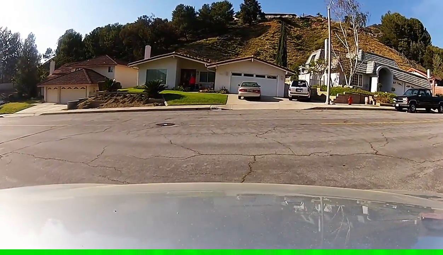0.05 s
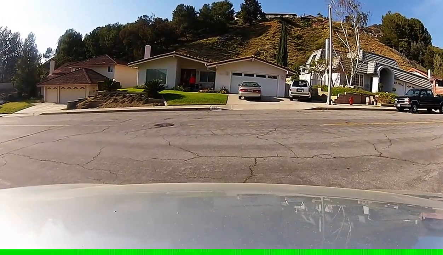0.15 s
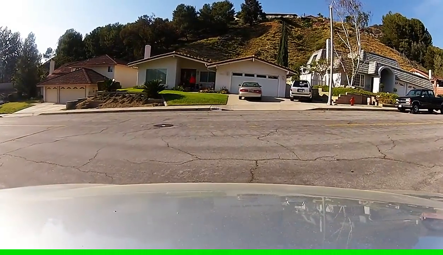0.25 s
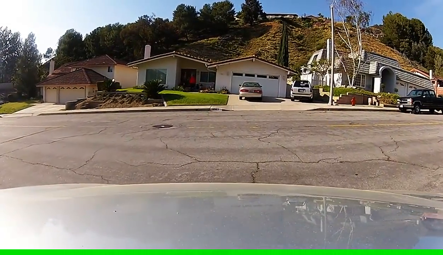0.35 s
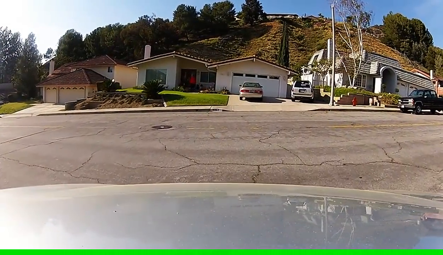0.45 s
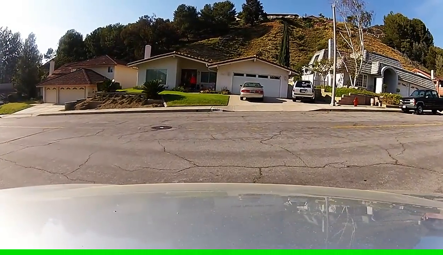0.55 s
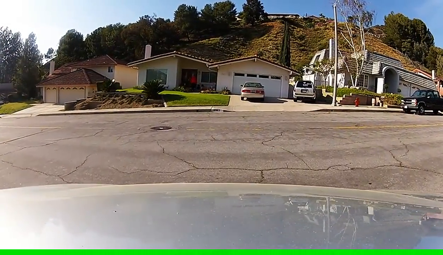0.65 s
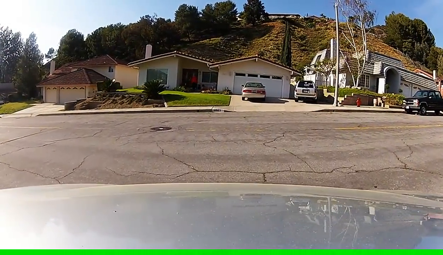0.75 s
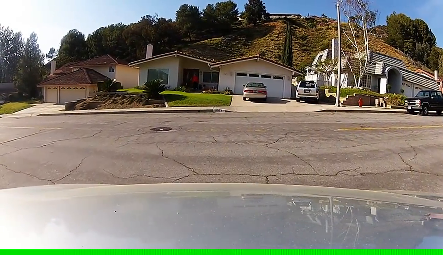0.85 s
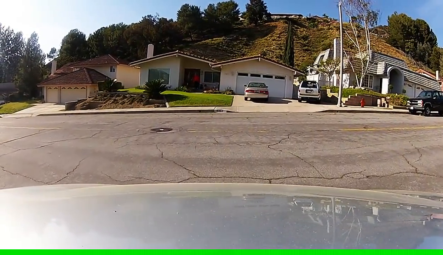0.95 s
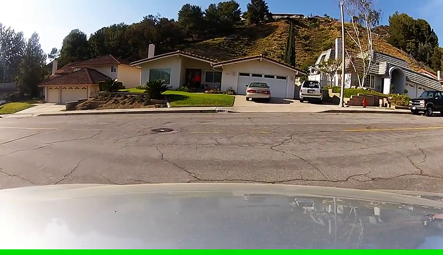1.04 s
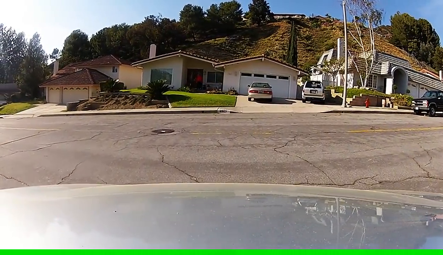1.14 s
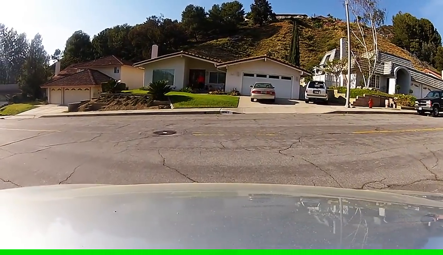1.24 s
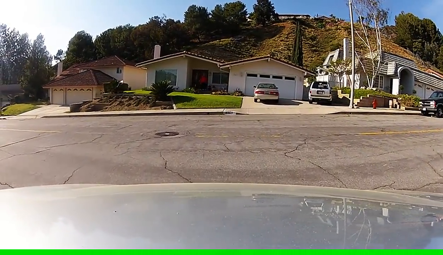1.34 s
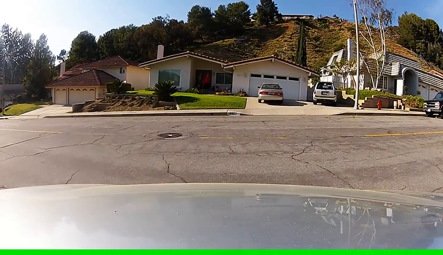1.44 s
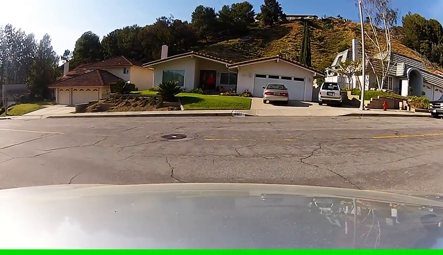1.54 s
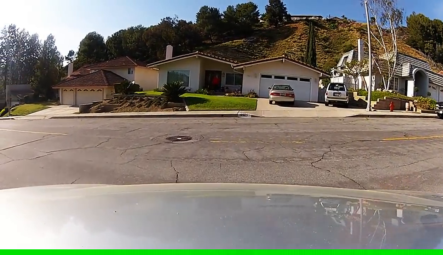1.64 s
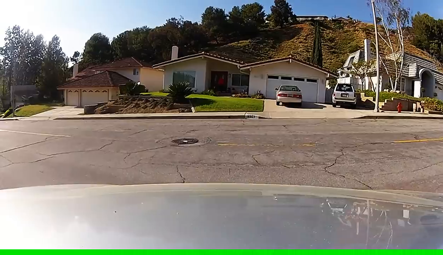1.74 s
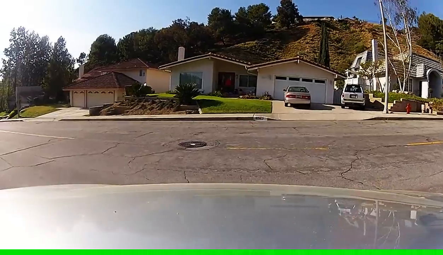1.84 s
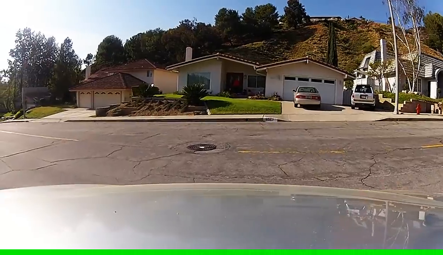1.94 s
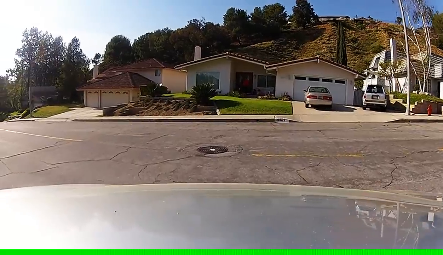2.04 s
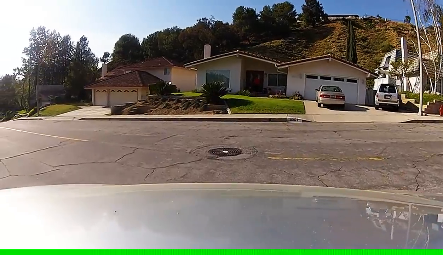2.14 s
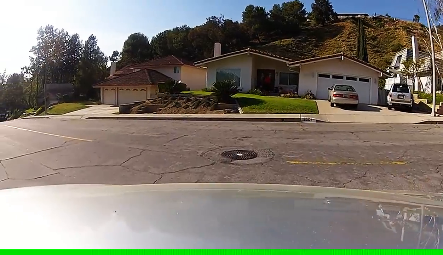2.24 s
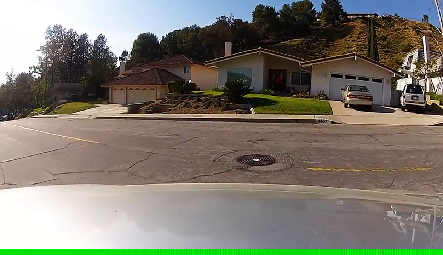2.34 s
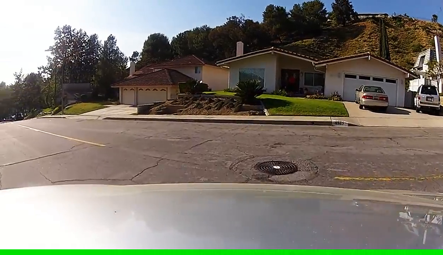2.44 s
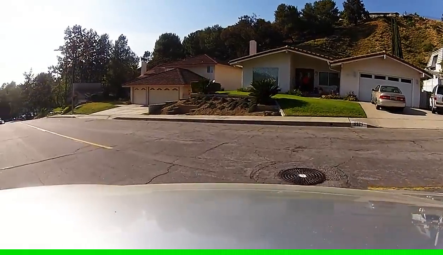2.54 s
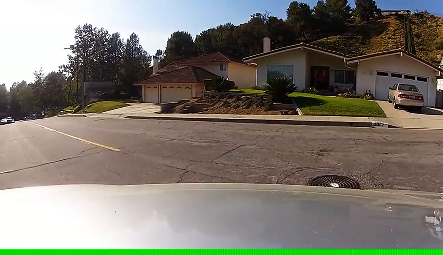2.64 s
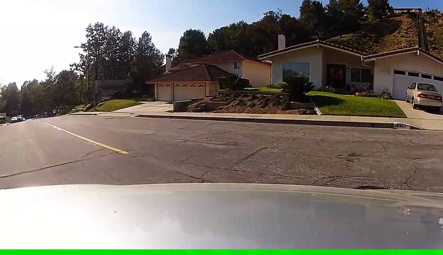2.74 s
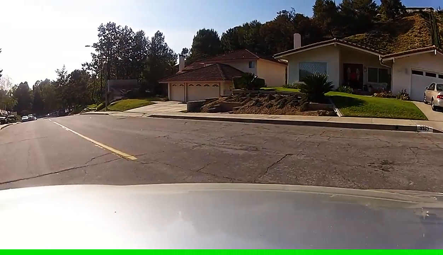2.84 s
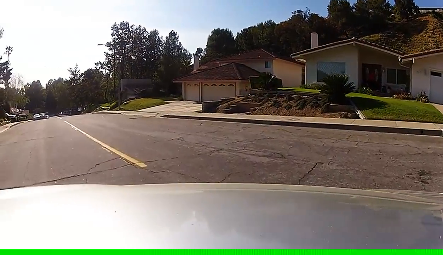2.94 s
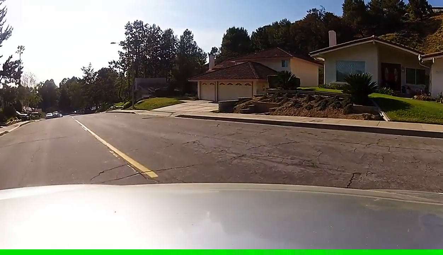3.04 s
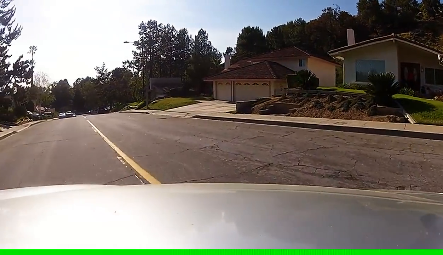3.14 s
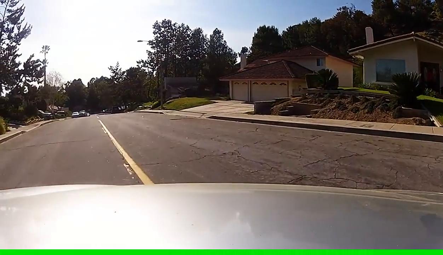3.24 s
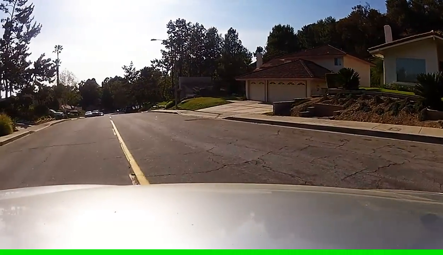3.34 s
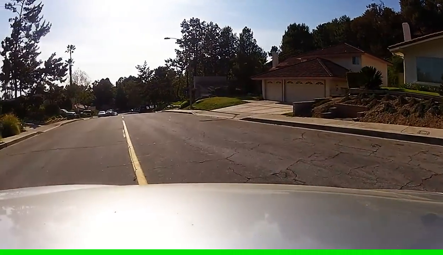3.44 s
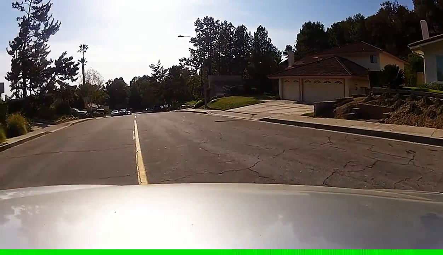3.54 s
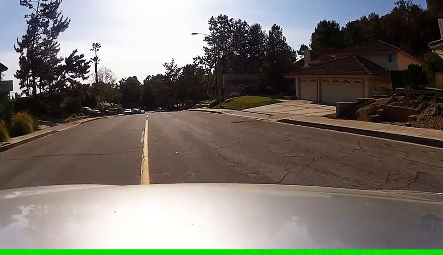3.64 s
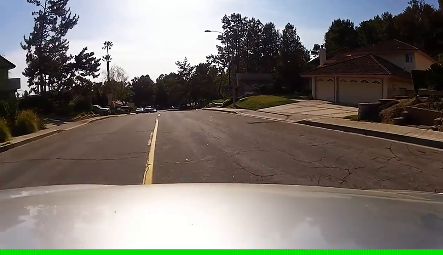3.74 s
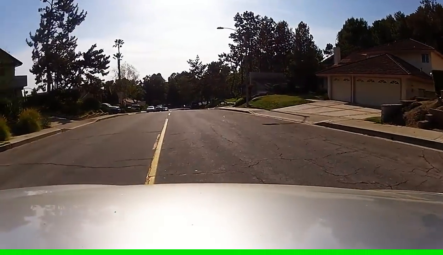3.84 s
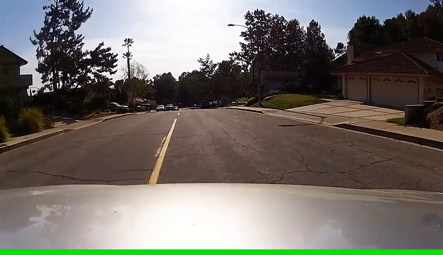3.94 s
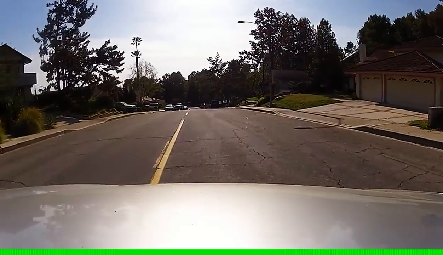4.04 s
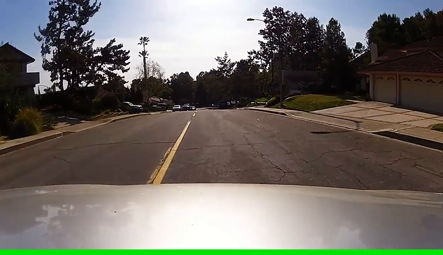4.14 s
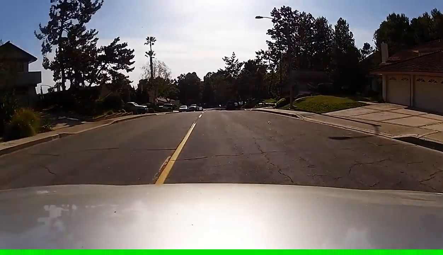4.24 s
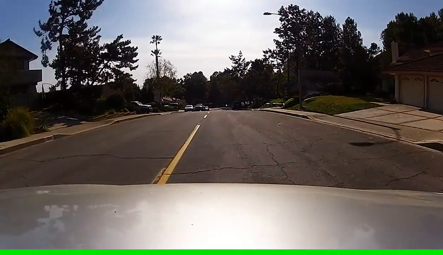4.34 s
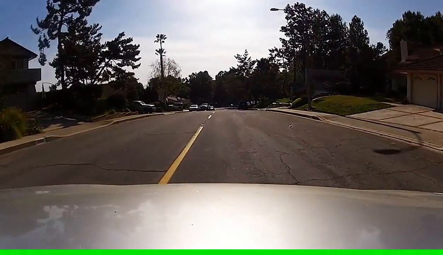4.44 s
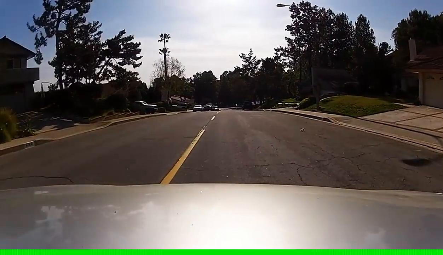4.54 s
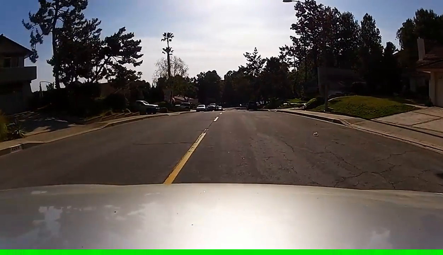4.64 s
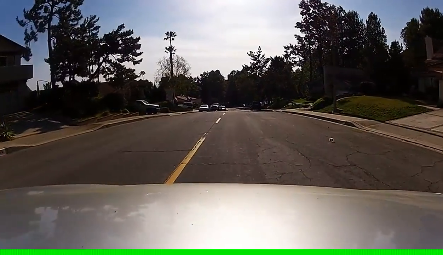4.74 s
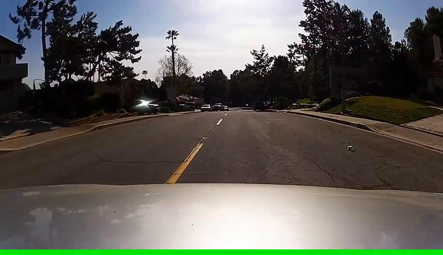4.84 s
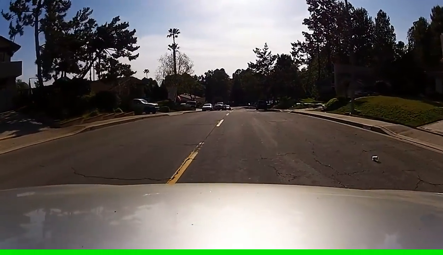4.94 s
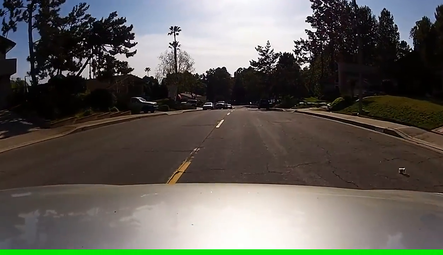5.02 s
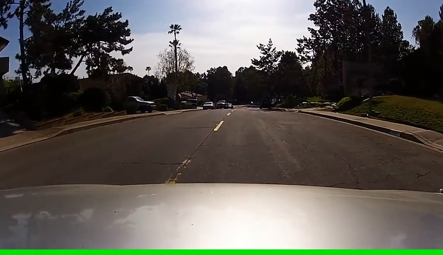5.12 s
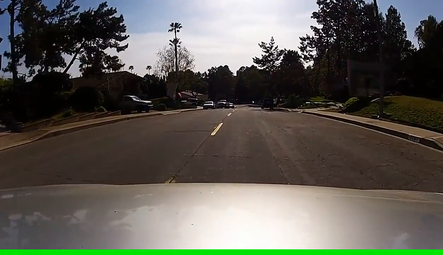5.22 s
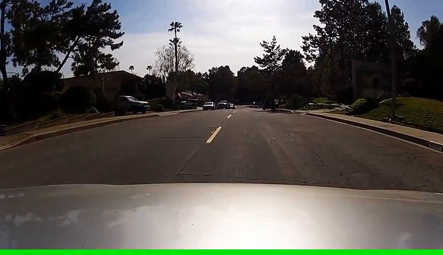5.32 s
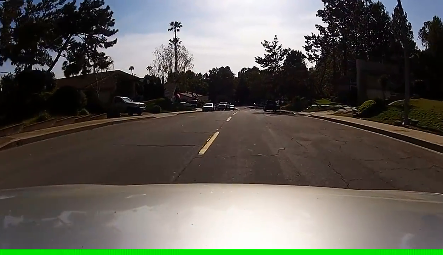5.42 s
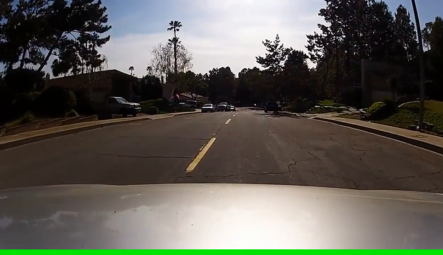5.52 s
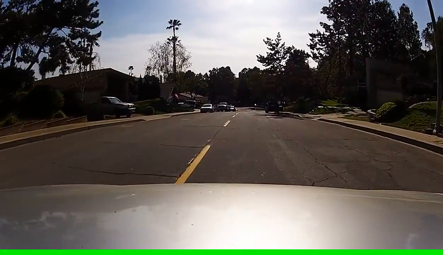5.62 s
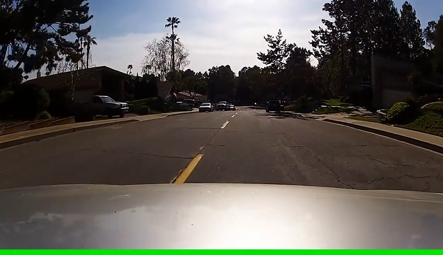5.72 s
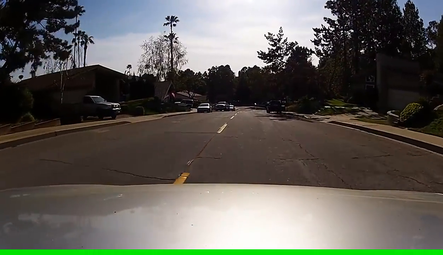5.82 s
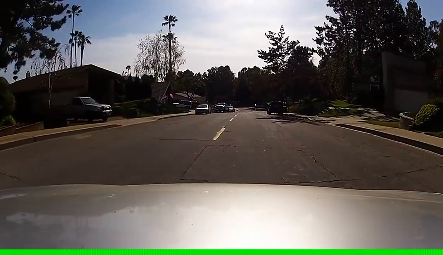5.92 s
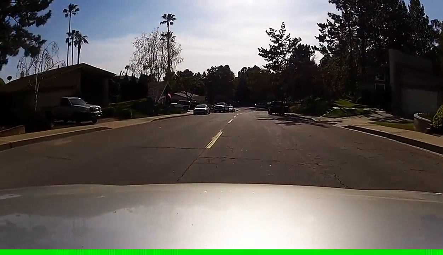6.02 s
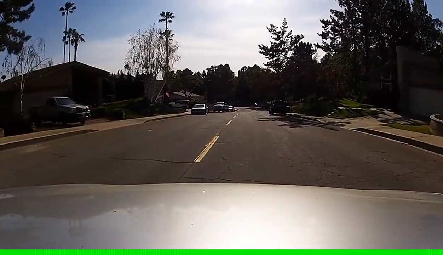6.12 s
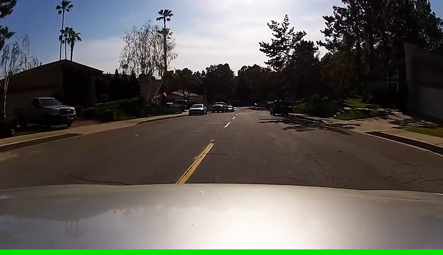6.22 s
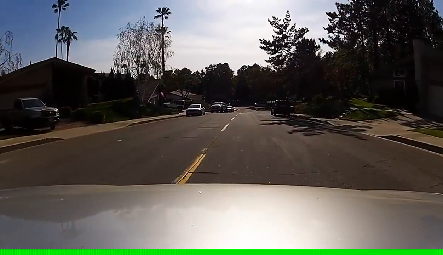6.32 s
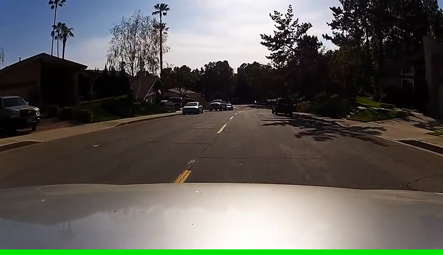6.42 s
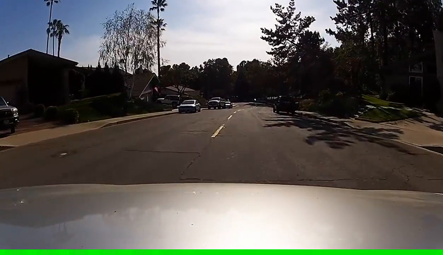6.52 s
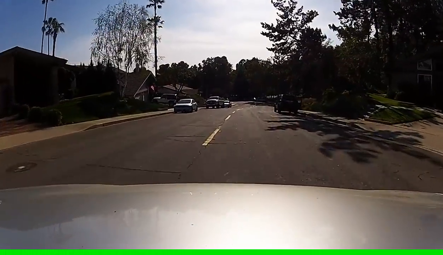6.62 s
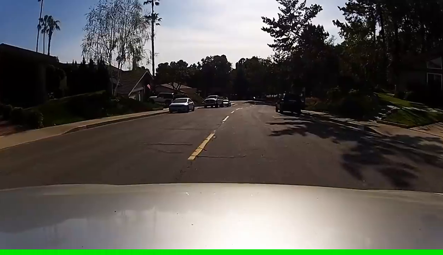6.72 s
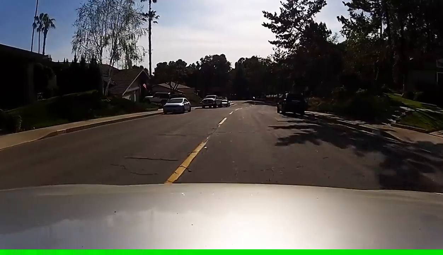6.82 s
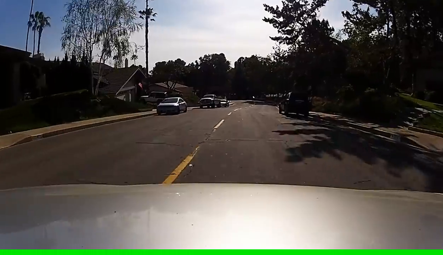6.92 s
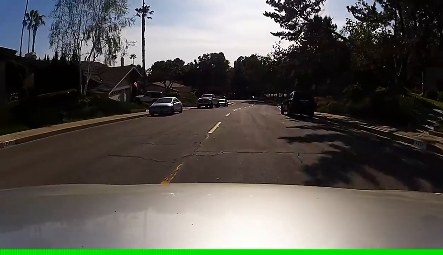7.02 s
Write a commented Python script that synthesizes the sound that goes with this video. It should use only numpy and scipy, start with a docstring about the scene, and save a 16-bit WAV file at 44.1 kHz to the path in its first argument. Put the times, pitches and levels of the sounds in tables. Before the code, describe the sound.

Heard from a microphone sealed in a case on the car, a V8 burbles unevenly at idle with a faint steering-pump moan. From about two and a half seconds it pulls away, deepening and rising. Revs drop at an upshift, then climb again. Soft boomy bumps, low road rumble, thin pump whine and rushing air build with speed on an open residential street.

```python
"""A V8 engine burbles at idle, then pulls twice with an upshift between: firing pulses and crank orders.
Road noise booms and thuds through resonant body panels, over bumps, with passing swells of road noise.
Pumps, alternator, gearbox and driveline add tones; the engine bay whirrs and air rushes by as noise.
A microphone in a closed case on the car hears it: the case rings at fixed pitches, and uneven
sampling mirrors the sound as a faint sizzle in the treble."""
import sys
import numpy as np
from scipy.fft import rfft, irfft, next_fast_len
from scipy.io import wavfile
from scipy.ndimage import uniform_filter1d, map_coordinates

SR = 44100
rng = np.random.default_rng(int(sys.argv[2]) if len(sys.argv) > 2 else 0)


def to_wav(s):
    """Save 16-bit WAV."""
    ch = np.atleast_2d(s).T  # columns
    pcm = np.round(np.clip(ch, -1, 1) * 32767)  # PCM
    wavfile.write(sys.argv[1], SR, pcm.astype(np.int16))


N = 311787

# Crankshaft through idle, pull-away, upshift and second pull. Each row: time in s, speed in turns per s.
CRANK_SPEED = [(0, 13.1), (0.5, 12.48), (0.95, 12.2), (1.5, 12.48), (2.7, 12.35), (3, 13.35), (4, 18.95),
               (4.35, 21.3), (4.6, 22.8), (4.88, 24.25), (5.2, 23.1), (5.46, 22), (5.53, 21.4), (5.6, 19.9),
               (5.68, 18.55), (5.8, 19.95), (5.95, 21), (6.2, 22), (6.35, 21.9), (6.5, 22.8), (6.7, 23.45),
               (6.92, 24.15), (7.07, 24.3)]
# How hard the engine works. Each row: time in s, effort in dB relative to idle.
EFFORT = [(0, 1.5), (0.28, -1.5), (0.4, -6), (0.55, -3), (1.15, 0), (1.7, 7), (2.25, 2.5), (2.5, 11.5),
          (3.0, 14.5), (3.4, 17), (4.35, 15.5), (4.7, 26), (5.05, 16.5), (5.65, 19), (6.25, 23), (7.07, 15)]
# Road speed: the car creeps, then gathers way. Each row: time in s, speed in m/s.
ROAD_SPEED = [(0, 0.59), (1, 0.21), (2.1, 1.37), (3, 4.27), (4, 7.4), (4.75, 8.62), (5.3, 8.28),
              (6.2, 9.64), (7.07, 9.7)]
IDLE_TURNS_PER_S, CRUISE_M_PER_S = 12.4, 10  # reference speeds of the level laws

# Exhaust strength of the eight cylinders in firing order. Each entry: relative level in dB.
CYLINDER_DB = [-19, -41, -4.5, -4.5, -12, 1, -1.5, -0.5]
# Resonances of the body panels. Each row: frequency in Hz, width in Hz, peak gain in dB.
BODY_MODES = [(81.5, 23, 5), (121.4, 11.3, 7), (179.4, 18.8, 17.5), (218.2, 25, 11)]
# Resonances of the microphone's case. Each row: frequency in Hz, width in Hz, peak gain in dB.
CASE_MODES = [(451, 19, 3.5), (691.8, 12, 9), (730.6, 37.4, 15), (852, 72, 10), (1098, 44, 6),
              (1622, 21, 5), (1870, 23, 6), (2217, 62, 7.5), (2376, 88, 6), (3100, 87, 10), (3508, 53, 9),
              (3758, 55, 11.5)]

# Spectra ahead of any resonances. Each row: frequency in Hz, relative level in dB per Hz.
EXHAUST_SPECTRUM = [(30, -40), (70, -24), (110, 4.5), (200, 0.5), (260, -8), (400, -16), (560, -47),
                    (1200, -81)]
BOOM_SPECTRUM = [(70, -44), (130, -4.5), (170, 3), (225, 4.5), (252, -21.5), (400, -42), (800, -91)]
SWAY_SPECTRUM = [(8, -25), (18, -2), (25, 13.5), (33, -4.5), (42, 4.5), (80, -95)]
RUMBLE_SPECTRUM = [(25, -28), (38, -1), (50, 47), (68, 42.5), (80, 37), (120, -89)]
DRONE_SPECTRUM = [(55, -27), (74, -6), (90, 2), (135, 0), (190, -26.5), (300, -28.5), (800, -91)]
GROWL_SPECTRUM = [(150, -34), (260, 3.5), (320, 2), (370, -3), (430, -8.5), (520, -12.5), (620, -29),
                  (1200, -88)]
WHIRR_SPECTRUM = [(120, -8), (300, -8), (450, 3.5), (580, -7), (660, 3), (750, 2), (1000, -0.5), (1300, -3),
                  (1700, 5), (2050, -1), (2380, 0.5), (2650, -27), (4000, -17), (6000, -51.5)]
PUMP_SPECTRUM = [(400, -29), (590, -21.5), (690, 2), (730, 4.5), (790, 2), (850, -1), (900, -4.5),
                 (1650, 1.5), (2100, -4.5), (2350, -3), (2700, -37)]
RUSH_SPECTRUM = [(400, -10), (700, -10), (1150, 6), (2000, 4), (2600, 2), (3000, -12), (4200, -13),
                 (6200, -51)]
HISS_SPECTRUM = [(1200, -22), (2200, 0), (2750, 11.5), (2950, -0.5), (3250, 5.5), (3700, -8), (4300, -9),
                 (5200, -5), (6100, -48), (7500, -9), (9500, -25)]

# Clean hum of the engine. Each row: multiple of crank speed, relative level in dB.
HUM_ORDERS = [(5, -9), (7, -8), (7.5, -14), (8, -5), (9, -9), (10, -7), (12, -12)]
HUM_TOP_HZ = 246
# Roar under open throttle. Each row: multiple of crank speed, relative level in dB.
ROAR_ORDERS = [(9, -1), (10, -10), (11, -15), (12, -14), (13, -18), (14, -23), (16, -22), (17, -26),
               (18, -26), (19, -28)]
# The roar in the two pulls. Each row: time in s, roar gain in dB.
ROAR_LEVEL = [(2.4, -65), (3.3, -36.5), (4.3, -34.5), (4.78, -26), (4.92, -32), (5.1, -42), (5.6, -41.5),
              (6.2, -30.5), (6.6, -33), (7.07, -41)]

# Engine laws. Each row: dB at idle and zero effort, dB per tenfold crank speed, dB per dB of effort.
HUM_LAW = (-5, 10.4, 0.25)  # relative to the exhaust
WHIRR_LAW = (-50.5, 13.9, 0.29)
WHINE_LAW = (-58, 38.7, 0.24)
ALTERNATOR_LAW = (-73, 58, 0.15)
ALTERNATOR_PER_TURN = 82.7  # cycles per crank turn

# Road-speed laws. Each row: level in dB at cruising speed, dB per tenfold speed.
BOOM_LAW = (-31, 14.5)
RUMBLE_LAW = (-40.5, 15)
DRONE_LAW = (-35, 17.4)
GROWL_LAW = (-41.5, 28.3)
SWAY_LAW = (-39.5, 10)
RUSH_LAW = (-35.5, 38.8)
HISS_LAW = (-43, 94.5)

# Driveline taking up the car's weight. Each row: time in s, pitch in Hz, hum gain in dB.
DRIVELINE = [(0.7, 59.2, -69), (1.05, 61.9, -51), (1.3, 64.3, -41), (1.5, 69.6, -57), (1.75, 73.4, -37),
             (2.2, 75.6, -69)]
# Tones of the driveline. Each row: multiple of its pitch, relative level in dB.
DRIVELINE_TONES = [(1, -3.5), (1.65, -9)]
# Gearbox groan after the upshift. Each row: frequency in Hz at its middle, level in dB.
GROAN_TONES = [(206, -28.5), (335, -46), (374, -41)]
GROAN_MIDDLE_S, GROAN_HALF_S, GROAN_SAG_PER_S = 6.02, 0.3, 0.1

# Cracks and dips in the asphalt. Each row: time in s, panel thud in dB, extra for the upper panel in dB,
# jolt of the mount in dB.
BUMPS = [(1.499, -31, 0, -52), (1.559, -36, 5, -57), (1.715, -29.5, 10, -41), (1.826, -24, 8, -45),
         (1.874, -40, 25, -62), (2.063, -29, 2, -54), (2.439, -23, -1, -44), (2.536, -24, 4, -55),
         (2.805, -21, -5, -52), (2.981, -29, 1, -35), (3.124, -26, 4, -47), (3.162, -23.5, 15.5, -28.5),
         (3.21, -19, 5, -47), (3.509, -21.5, -2, -45), (3.635, -17.5, 9.5, -38), (3.714, -19, 9.5, -27),
         (3.932, -23, -4, -35), (4.107, -23, 2, -24), (4.216, -21.5, -5, -45), (4.563, -24, 5, -51),
         (4.777, -23, 14, -55), (5.172, -19.5, -7, -25), (5.27, -25, -6, -45), (5.507, -19.5, 0, -38),
         (5.714, -22.5, 14, -35), (5.94, -17, 10, -31), (5.988, -15, 2, -40), (6.087, -18, 3, -34),
         (6.241, -15, 3, -36), (6.299, -15, 0, -27), (6.48, -13.5, 2, -28), (6.575, -14.5, -7, -22.5),
         (6.744, -19, -7, -45), (6.903, -19, 2, -45)]
BUMP_RISE_S, JOLT_RISE_S, JOLT_FALL_S = 0.027, 0.11, 0.14
THUD_DAMPING = 0.58  # factor on the panels' decay rate; below 1 the thuds ring longer and softer
# Passing changes of road noise. Each row: middle in s, half length in s, change of rumble in dB,
# change of drone in dB, change of growl in dB.
ROAD_SWELLS = [(2.25, 0.23, 10.5, 5.5, 4.5), (2.547, 0.12, -1, 6.5, 2), (3.216, 0.3, -3, 4.5, 2),
               (4.38, 0.18, 0, 8, -0.5), (4.755, 0.17, -5, 3, -2), (5.355, 0.4, 0, 6.5, -4),
               (6.02, 0.35, -2, 3.5, 4), (6.935, 0.19, -3, 9, 1)]
SHIVER_DB, SHIVER_END_S, SHIVER_FADE_DB_PER_S, MOUNT_HZ = -35.5, 0.14, 19, 24.8

# Whine of a belt-driven pump, third harmonic upward. Each entry: relative level in dB.
WHINE_HARMONIC_DB = [0, -1, -4, -5, -7, -4, -3, 0, -11, -4, -9, -3]
VANES_PER_TURN = 9.65
# Swells and dips of the whine. Each row: middle in s, half length in s, change in dB.
WHINE_SWELLS = [(2.2, 0.22, -5), (2.9, 0.13, 4), (3.28, 0.1, 3), (3.98, 0.16, 5.5), (4.4, 0.22, -3),
                (4.95, 0.22, 2.5), (5.47, 0.06, 2), (5.8, 0.2, -4), (6.24, 0.1, 4), (6.5, 0.12, -2),
                (6.98, 0.12, 2)]

# Moan of the steering pump. Each row: harmonic, relative level in dB.
MOAN_HARMONICS = [(1, 11), (4, 3), (6, -1.5), (7, -18), (8, -7.5), (9, -2)]
MOAN_PER_TURN = 14.6  # cycles per crank turn
# The steering stroke. Each row: time in s, moan gain in dB.
MOAN_LEVEL = [(0.35, -72), (0.6, -48), (0.95, -48), (1.15, -55), (1.45, -49), (1.65, -64), (2.6, -88)]
# The pump's lowest tone in the panels. Each row: time in s, boom gain in dB.
STEERING_BOOM = [(1.15, -60), (1.45, -44), (1.7, -42), (1.82, -33), (1.96, -48), (2.08, -41), (2.35, -44),
                 (2.5, -32), (2.95, -30.5), (3.2, -33), (3.5, -70), (4, -110)]

# Gusts over the case. Each row: middle in s, half length in s, extra hiss in dB.
GUSTS = [(4.43, 0.03, 5), (4.732, 0.14, 4), (5.39, 0.05, 5), (5.485, 0.045, 13), (5.57, 0.05, 6),
         (5.69, 0.08, 8), (6.085, 0.055, 9), (6.48, 0.061, 10), (6.76, 0.07, 8), (6.96, 0.08, 11)]

IMAGE_HZ, TOP_HZ = 12000, 15350  # mirror frequency and upper band limit


def amp(db):
    """Decibel definition: twenty decibels make a tenfold amplitude."""
    return 10 ** (np.asarray(db) / 20)


def unit(x):
    """Normalization of power: scale to rms 1."""
    return x / np.sqrt(np.mean(x ** 2) + 1e-20)


def curves(rows):
    """Linear interpolation: one value per sample for each column after the time."""
    seconds, *columns = np.transpose(rows)
    return [np.interp(np.arange(N) / SR, seconds, column) for column in columns]


def wobble(rate):
    """Band-limited fluctuation: a smooth random curve with rate knots a second."""
    knots = rng.standard_normal(int(N * rate / SR) + 4)
    return map_coordinates(knots, [np.arange(N) * rate / SR])


def swell(middle, half_length, db):
    """Gaussian envelope: a bell-shaped change of level in dB."""
    return db * np.exp(-((np.arange(N) / SR - middle) / half_length) ** 2)


def noise():
    """White noise: equal mean power at every frequency."""
    return rng.standard_normal(N)


def filtered(x, response):
    """Linear filtering: multiply the spectrum by a response of frequency."""
    size = next_fast_len(N + SR // 2)
    freqs = np.fft.rfftfreq(size, 1 / SR)
    return irfft(rfft(x, size) * response(freqs), size)[:N]


def ringing(modes, f):
    """Modal resonance: a wall passes sound best at its damped natural frequencies."""
    return 1 + sum((amp(db) - 1) * 1j * f * width / (hz * hz - f * f + 1j * f * width)
                   for hz, width, db in modes)


def shaped(x, spectrum, modes=()):
    """Source-filter principle: colour x by a spectrum and by resonances, at rms 1."""
    hz, db = np.transpose(spectrum)

    def response(f):
        source = amp(np.interp(np.log(f + 1), np.log(hz), db))
        return source * ringing(modes, f)

    return unit(filtered(x, response))


def steadied(x, seconds):
    """Envelope normalization: divide by the running rms to even out slow swells."""
    power = np.abs(uniform_filter1d(x * x, int(seconds * SR)))
    return x / np.sqrt(power + 1e-6)


def orders(angle, table, waver_db):
    """Rotational orders: sines on multiples of a turning angle, each wavering in level."""
    return sum(amp(db + waver_db * wobble(5)) * np.sin(2 * np.pi * (k * angle + rng.random()))
               for k, db in table)


def by_engine(law):
    """Power law of rotation: dB follow the logarithm of crank speed, plus a share of the effort."""
    idle_db, slope_db, effort_share = law
    speed, = curves(CRANK_SPEED)
    effort_db, = curves(EFFORT)
    return idle_db + slope_db * np.log10(speed / IDLE_TURNS_PER_S) + effort_share * effort_db


def by_speed(law):
    """Power law of travel: dB follow the logarithm of road speed."""
    cruise_db, slope_db = law
    speed, = curves(ROAD_SPEED)
    return cruise_db + slope_db * np.log10(np.maximum(speed, 1e-2) / CRUISE_M_PER_S)


def exhaust(turns, scatter_db):
    """Periodic impulse excitation: four firings a turn, whose unequal strengths give the V8 its burble."""
    firings = np.flatnonzero(np.diff(np.floor(4 * turns)))
    scatter = scatter_db * rng.standard_normal(len(firings))
    pulses = np.zeros(N)
    pulses[firings] = amp(np.resize(CYLINDER_DB, len(firings)) + scatter)
    return shaped(pulses, EXHAUST_SPECTRUM, BODY_MODES)


def engine_hum(turns):
    """Forced vibration: crank orders drive the body panels, with the high ones cut off."""
    tones = orders(turns, HUM_ORDERS, waver_db=2.5)
    return unit(filtered(tones, lambda f: ringing(BODY_MODES, f) / (1 + (f / HUM_TOP_HZ) ** 8)))


def engine(turns):
    """Superposition: exhaust pulses and a hum that firms up with the revs share one steadied level."""
    effort_db, = curves(EFFORT)
    mixture = exhaust(turns, scatter_db=3.0) + amp(by_engine(HUM_LAW)) * engine_hum(turns)
    return amp(effort_db - 49.5) * steadied(mixture, seconds=0.043)


def roar(turns):
    """Order spectrum: at open throttle the higher crank orders stand out as a rough chord."""
    roar_db, = curves(ROAR_LEVEL)
    return amp(roar_db) * orders(turns + 0.0023 * wobble(22), ROAR_ORDERS, waver_db=2.0)


def road_boom():
    """Random excitation of modes: noise from the road booms in the body panels."""
    boom = steadied(shaped(noise(), BOOM_SPECTRUM, BODY_MODES), seconds=0.032)
    return amp(by_speed(BOOM_LAW)) * boom


def thuds():
    """Slowed decay of modes: each bump rings the panels, and narrower resonances last longer."""
    hz, width, db = np.transpose(BODY_MODES)[:, :, None]
    age = np.arange(SR // 4) / SR - BUMP_RISE_S
    rise = np.clip(1 + age / BUMP_RISE_S, 0, 1)
    envelope = rise * np.exp(-THUD_DAMPING * np.pi * width * np.maximum(age, 0))
    shares = amp(db) ** 2 / np.sum(amp(db) ** 2)
    is_upper = hz == hz.max()
    out = np.zeros(N + SR)
    for s, thud_db, upper_db, _ in BUMPS:
        sizes = shares * amp(thud_db + upper_db * is_upper + rng.standard_normal(hz.shape))
        ring = sizes * envelope * np.sin(2 * np.pi * (hz * age + rng.random(hz.shape)))
        start = round((s - BUMP_RISE_S) * SR)
        out[start:start + len(age)] += ring.sum(0)
    return out[:N]


def jolts():
    """Incoherent addition: each blow to the mount rises and dies away, and their powers add."""
    t = np.arange(N) / SR

    def shape(age):
        rise = np.clip(1 + age / JOLT_RISE_S, 0, 1)
        return rise * np.exp(-np.maximum(age, 0) / JOLT_FALL_S)

    return np.sqrt(sum((amp(db) * shape(t - s)) ** 2 for s, *_, db in BUMPS))


def mount():
    """Oscillation of a sprung mass: an even shiver fades out; ragged sway grows with speed and bumps."""
    fade_db = SHIVER_FADE_DB_PER_S * np.maximum(np.arange(N) / SR - SHIVER_END_S, 0)
    cycles = np.cumsum(MOUNT_HZ + 0.21 * wobble(10.0)) / SR
    shiver = np.sqrt(2) * np.sin(2 * np.pi * cycles)  # rms 1
    sway = steadied(shaped(noise(), SWAY_SPECTRUM), seconds=0.27)
    return amp(SHIVER_DB - fade_db) * shiver + np.hypot(amp(by_speed(SWAY_LAW)), jolts()) * sway


def road():
    """Rolling noise: rumble, drone and growl rise with speed, and swell or ease in passing."""
    rumble_db, drone_db, growl_db = sum(swell(middle, half, np.array(changes)[:, None])
                                        for middle, half, *changes in ROAD_SWELLS)
    drone_floor_db, growl_floor_db = -56, -61  # steady parts, independent of speed
    rumble_gain = amp(by_speed(RUMBLE_LAW) + rumble_db)
    drone_gain = np.hypot(amp(by_speed(DRONE_LAW) + drone_db), amp(drone_floor_db))
    growl_gain = np.hypot(amp(by_speed(GROWL_LAW) + growl_db), amp(growl_floor_db))
    rumble = rumble_gain * steadied(shaped(noise(), RUMBLE_SPECTRUM), seconds=0.12)
    drone = drone_gain * steadied(shaped(noise(), DRONE_SPECTRUM, BODY_MODES), seconds=0.13)
    growl = growl_gain * shaped(noise(), GROWL_SPECTRUM, CASE_MODES)
    return rumble + drone + growl


def transmission():
    """Frequency modulation: the driveline hum climbs at pull-away; the gearbox groan sinks after the shift."""
    hz, hum_db = curves(DRIVELINE)
    hum = amp(hum_db) * orders(np.cumsum(hz) / SR, DRIVELINE_TONES, waver_db=2.0)
    t = np.arange(N) / SR - GROAN_MIDDLE_S
    clock = np.cumsum(1 - GROAN_SAG_PER_S * t) / SR  # a slowing clock lowers every pitch
    groan = sum(amp(db + 1.5 * wobble(25)) * np.sin(2 * np.pi * (pitch * clock + 0.16 * wobble(30)))
                for pitch, db in GROAN_TONES)
    return hum + np.exp(-(t / GROAN_HALF_S) ** 4) * groan


def whirr(turns):
    """Amplitude modulation: fan and valve noise pulses lightly at the firing rate."""
    firing = np.cos(2 * np.pi * 4 * turns)
    pulsing = noise() * (1 + 0.044 * firing)
    return amp(by_engine(WHIRR_LAW)) * shaped(pulsing, WHIRR_SPECTRUM, CASE_MODES)


def pump_whine(turns):
    """Swept excitation of resonances: the whine flares where its harmonics cross the case's modes."""
    # the belt runs a little unevenly, which blurs the higher tones most
    vanes = VANES_PER_TURN * turns + 0.0017 * wobble(25) + 0.002 * wobble(70)
    harmonics = orders(vanes, enumerate(WHINE_HARMONIC_DB, start=3), waver_db=1.5)
    whine_db = by_engine(WHINE_LAW) + sum(swell(*row) for row in WHINE_SWELLS)
    return amp(whine_db) * shaped(harmonics, PUMP_SPECTRUM, CASE_MODES)


def alternator(turns):
    """Locked rotation: a thin tone climbs with the revs and gains level steeply with them."""
    tone = orders(turns + 0.0011 * wobble(25), [(ALTERNATOR_PER_TURN, 0)], waver_db=2.5)
    return amp(by_engine(ALTERNATOR_LAW)) * tone


def steering(turns):
    """Harmonic series of a pump: it moans as the wheel is turned; its lowest tone booms in the panels."""
    moan_db, = curves(MOAN_LEVEL)
    boom_db, = curves(STEERING_BOOM)
    vanes = MOAN_PER_TURN * turns + 0.0054 * wobble(25)
    moan = unit(orders(vanes, MOAN_HARMONICS, waver_db=4.0))
    boom = amp(boom_db + 3 * wobble(30)) * np.sin(2 * np.pi * (vanes + 0.08 * wobble(30)))
    return amp(moan_db) * moan + boom


def air():
    """Turbulent flow noise: a low rush, and a hiss that grows faster with speed and flares in gusts."""
    gust_db = sum(swell(*gust) for gust in GUSTS)
    rush_gain = amp(by_speed(RUSH_LAW) + 0.054 * gust_db)
    flow_gain = amp(by_speed(HISS_LAW) + gust_db + 1.57 * wobble(90))
    still_air_db = -70
    rush = rush_gain * shaped(noise(), RUSH_SPECTRUM, CASE_MODES)
    hiss = np.hypot(flow_gain, amp(still_air_db)) * shaped(noise(), HISS_SPECTRUM, CASE_MODES)
    return rush + hiss


def scene():
    """Superposition: the pressures of all sources add at one microphone."""
    turns = np.cumsum(curves(CRANK_SPEED)[0]) / SR
    power_train = engine(turns) + roar(turns) + transmission()
    road_sounds = road_boom() + thuds() + mount() + road()
    machinery = whirr(turns) + pump_whine(turns) + alternator(turns) + steering(turns)
    return (power_train + road_sounds + machinery + air())[None]


def record(dry):
    """Sampling jitter: a periodic timing error mirrors the sound's slope about one high frequency."""
    x = dry[0]
    slope = np.diff(x, prepend=x[0])
    image = slope * np.cos(2 * np.pi * IMAGE_HZ * np.arange(N) / SR)
    tilted = filtered(image, lambda f: amp(np.interp(f, [8000, 12000, 15000], [4, 3, 0])))
    return filtered(x + tilted, lambda f: f < TOP_HZ)[None]


dry = scene()
out = record(dry)
to_wav(out)
```